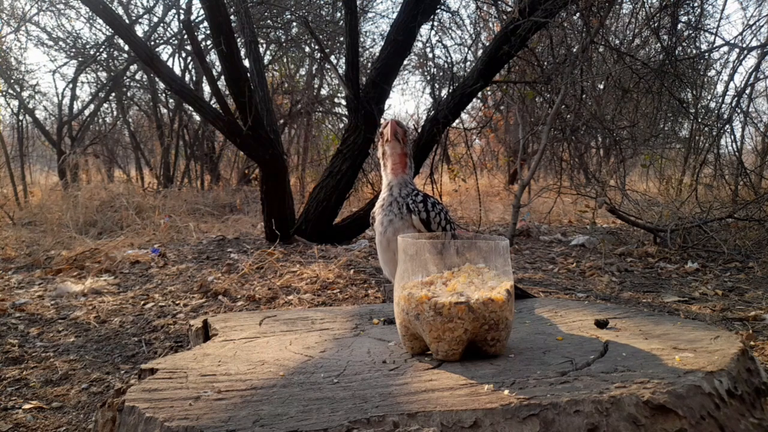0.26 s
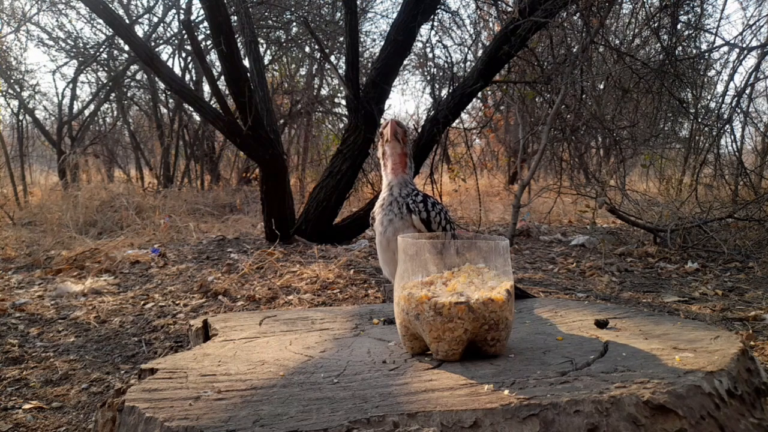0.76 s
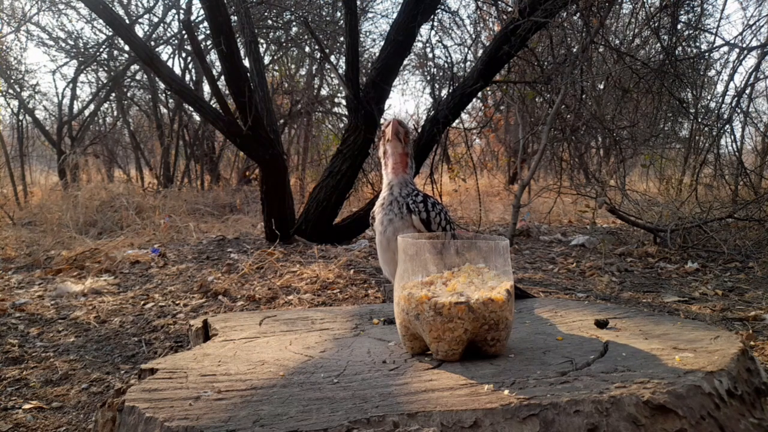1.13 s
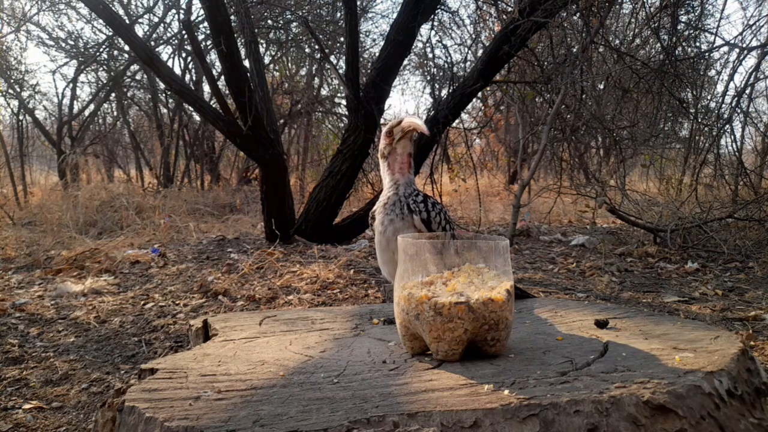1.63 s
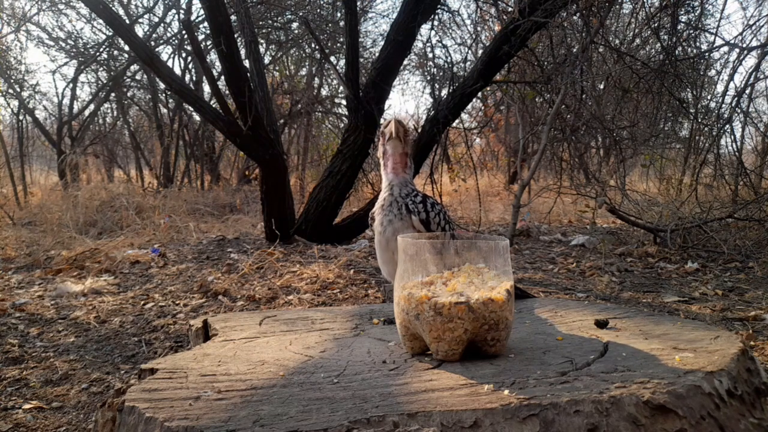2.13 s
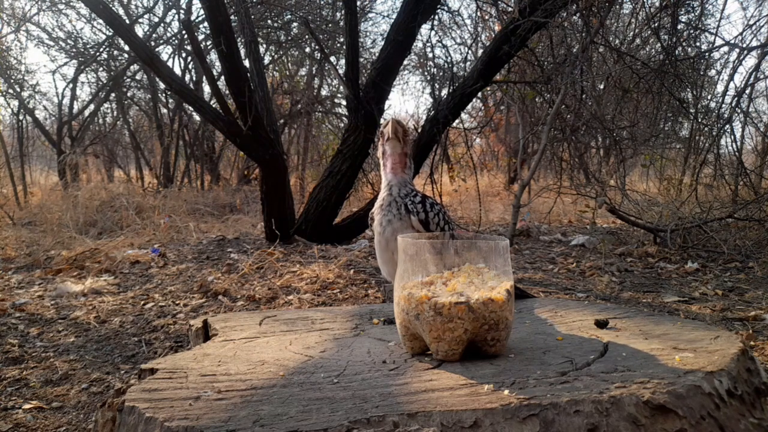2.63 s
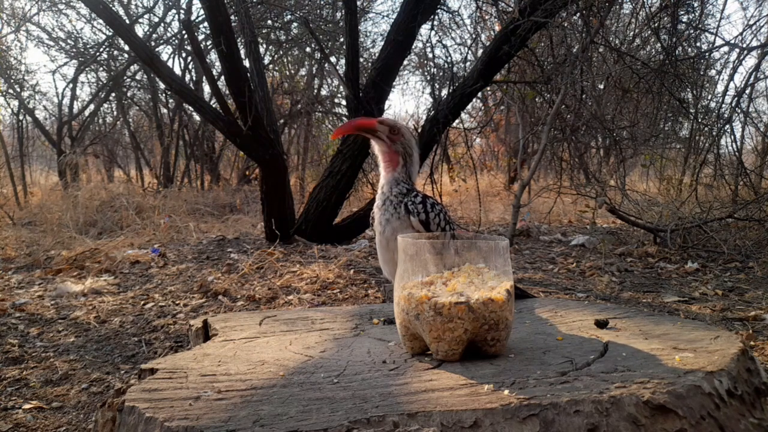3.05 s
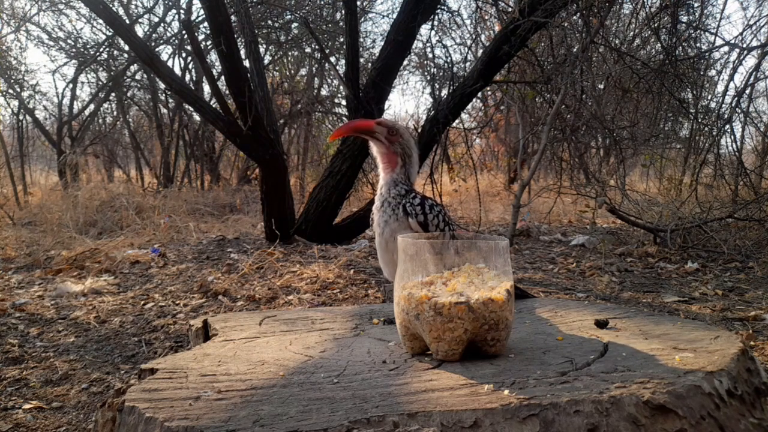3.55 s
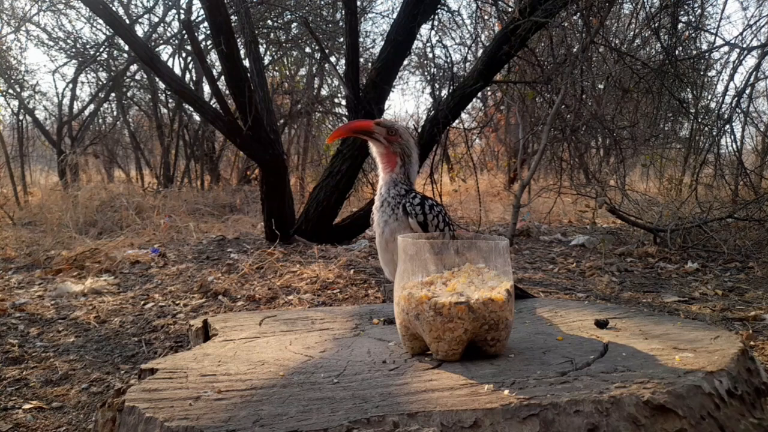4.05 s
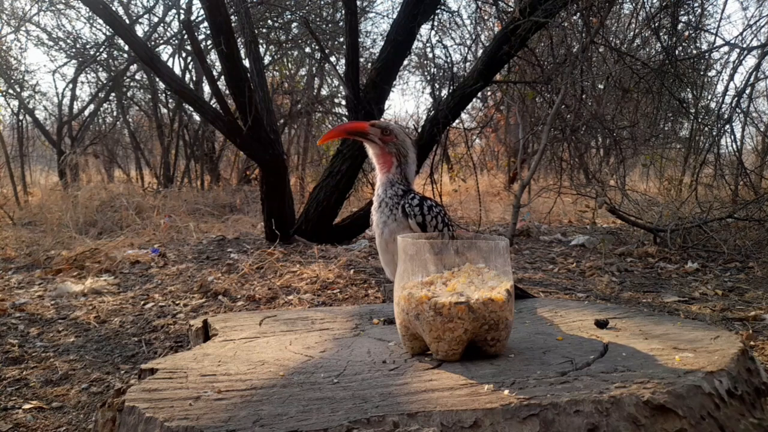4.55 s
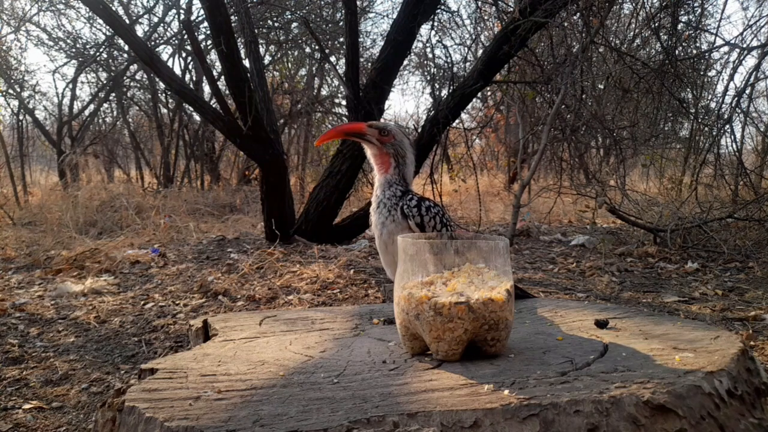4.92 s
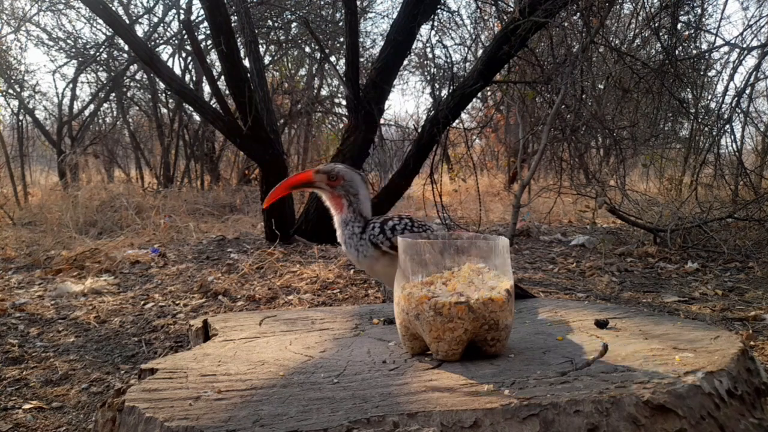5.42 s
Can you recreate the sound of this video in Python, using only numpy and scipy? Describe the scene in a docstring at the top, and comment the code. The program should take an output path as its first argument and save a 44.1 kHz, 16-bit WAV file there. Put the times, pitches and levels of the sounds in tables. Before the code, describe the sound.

A hornbill clucks close to a stereo microphone in dry bushland, about six notes a second in a long, even series. Each cluck swells on a steady pitch, flicks upward and breaks off in a short rasp, with a slight echo. After one tiny hesitation midway, the series carries on, then stops abruptly. Other birds call very faintly far off, over a low rumble and thin hiss.

```python
"""A long, even series of clucks from a red-billed hornbill on a stump, close to a stereo pair of
microphones in dry bushland. Each cluck swells on a steady note, flicks upward and breaks off in a
short rasp; ground and thicket throw it back. Then the bird stops. Other birds call faintly far off,
over a low rumble, and over air and hiss that the recorder turns down between clucks."""
import sys
import numpy as np
from scipy import signal
from scipy.fft import rfft, irfft
from scipy.io import wavfile
from scipy.ndimage import uniform_filter1d

SR = 44100
rng = np.random.default_rng(int(sys.argv[2]) if len(sys.argv) > 2 else 0)


def master(y):
    """Save y as 16-bit WAV."""
    cut = np.clip(np.atleast_2d(y).T, -1, 1)
    pcm = np.round(cut * 32767)  # scale
    wavfile.write(sys.argv[1], SR, pcm.astype(np.int16))


N = 250488
TIME = np.arange(N) / SR

# the hornbill's clucks: start_s, hold_s (until the flick), harsh_db (of the break)
CLUCK_EVENTS = [(.0715, .029, -3.5), (.2439, .038, -2.5), (.4258, .032, 3), (.6045, .032, -4),
                (.7819, .032, -7), (.9578, .032, 1), (1.1333, .034, -2), (1.309, .032, 5.5),
                (1.4826, .033, 5.5), (1.6561, .035, 4.5), (1.8296, .035, 8.5), (2.0035, .032, 4),
                (2.1759, .036, .5), (2.3538, .0305, -2.5), (2.5268, .032, 1), (2.6992, .032, -2.5),
                (2.8706, .036, -4.5), (3.1119, .022, -7), (3.2854, .03, -1), (3.4712, .0324, -3.5),
                (3.6519, .032, -5), (3.8341, .03, 5), (4.0113, .0306, 5.5), (4.1906, .035, 5.5),
                (4.3734, .029, 9.5), (4.5527, .03, 1.5), (4.7413, .029, -1.5), (4.9246, .028, 3),
                (5.1041, .031, -5)]
# the held note over the series, ahead of the throat: time_s, pitch_hz, level_db
HELD_NOTE = [(0, 604.5, -16.8), (1.1, 604.5, -16.7), (1.35, 596, -16.6), (1.9, 603.5, -16.4),
             (3.4, 608.5, -16.9), (4.35, 607, -16.5), (5.1, 603.5, -17.9)]
# filter of throat and bill: frequency_hz, gain_db
THROAT_RESPONSE = [(600, -2.5), (800, -1.2), (1380, -1.5), (1800, -29.5), (2000, -29), (2400, -37.5),
                   (3000, -37.5), (3600, -57), (4300, -41.5), (4850, -44), (5800, -55), (7800, -49.5),
                   (9800, -64.5), (12500, -51.5), (14000, -69.5)]
# change of colour with the bill turned aside: frequency_hz, gain_db
OFF_AXIS_RESPONSE = [(1200, 0), (2400, 1.5), (3200, -1.5), (4400, -5.5), (5500, 0), (7000, -3.5),
                     (12000, 1)]
# the bird's balance between the microphones: frequency_hz, left_over_right_db
MIC_BALANCE = [(600, -1.2), (780, -1.5), (1200, -3), (1450, 1.5), (1800, -2.5), (3000, -6), (4200, -4),
               (5400, -6), (6600, -3), (7700, 12.5), (9200, 2.5), (12500, 6.5)]
# its phase between the microphones: frequency_hz, left_lead_rad
MIC_PHASE = [(600, 0.43), (780, 0.085), (1200, 1.1), (1500, 1.5), (1800, 0.98), (3000, 0.77), (3600, 1.7),
             (5400, 2.2), (6800, 2.6), (12500, 3.2)]
# rasp as the note breaks: frequency_hz, relative_density_db
RASP_SPECTRUM = [(260, -20), (420, -18), (700, -9), (1000, 0), (1450, -6), (1900, -17), (2800, -29),
                 (3600, -37), (4500, -38), (7000, -42.5), (9500, -53.5), (12500, -42), (16000, -51.5)]
# single echoes off trunks: delay_s, gain_db
TRUNK_ECHOES = [(.043, -45), (0.074, -47)]
# hoarse birds far off: start_s, length_s, pitch_hz, width_hz, level_db
DISTANT_CALLS = [(3.57, 0.14, 1900, 300, -76), (3.673, 0.12, 3100, 500, -78),
                 (3.718, 0.096, 2400, 400, -76.5), (3.945, 0.24, 2150, 300, -76),
                 (4.124, .16, 2300, 300, -80.5), (4.269, 0.042, 2400, 200, -77)]
# colour of the low rumble: frequency_hz, relative_density_db
RUMBLE_SPECTRUM = [(30, -21), (40, -2), (48, 2.5), (57, -2), (70, -1), (100, -2.5), (150, -11.5),
                   (220, -18)]
# slow swells of the rumble: time_s, level_db
RUMBLE_SWELLS = [(0, -60), (2.4, -55.5), (3.6, -60), (4.1, -56.5), (5.68, -61)]
# colour of the open air: frequency_hz, relative_density_db
AIR_SPECTRUM = [(150, -4.5), (300, 2.5), (500, -3), (800, -4), (1300, -15), (2200, -19.5), (3500, -26),
                (5000, -49.5)]
# colour of the thin hiss: frequency_hz, relative_density_db
HISS_SPECTRUM = [(2000, -7.5), (3200, -3.5), (4500, 1), (6000, 3), (8000, -7), (9500, -6), (12500, 0),
                 (15800, -4.5)]
# slow swell of the hiss, ahead of the suppressor: time_s, level_db
HISS_SWELL = [(0, -71), (1.8, -70.8), (3.2, -68), (4.4, -70), (5.68, -70)]
# how alike noise is at the two microphones: frequency_hz, correlation
MIC_CORRELATION = [(40, 1), (150, .62), (400, 1), (1200, 0.33), (3000, -0.063), (6000, -.15),
                   (14000, 0.096)]


def hornbill(rasp_db=-40, rasp_delay_s=.006, rasp_rise_s=.0025, rasp_fall_s=.012, airflow_db=-34.5):
    """The bird close by: a little air noise rides on each note, and a puff of rasp follows its flick."""
    voice, puffs = np.zeros((2, N)), np.zeros(N)
    for start_s, hold_s, harsh_db in CLUCK_EVENTS:
        note, at = cluck(start_s, hold_s, harsh_db), int(start_s * SR)
        voice[:, at:at + note.shape[1]] += note
        span = slice(at, at + SR // 6)
        from_peak_s = TIME[span] - start_s - hold_s - rasp_delay_s
        puff = np.exp(np.minimum(from_peak_s / rasp_rise_s, -from_peak_s / rasp_fall_s))
        puffs[span] += from_db(.45 * harsh_db) * puff
    voice = signal.sosfiltfilt(highpass(3, hz=330), voice)  # a small throat radiates little bass
    airflow = uniform_filter1d(np.abs(voice).mean(0), size=150)
    return voice + (from_db(rasp_db) * puffs + from_db(airflow_db) * airflow) * noise(RASP_SPECTRUM)


def cluck(start_s, hold_s, harsh_db, attack_s=.0034, head_turn_s=2.98):
    """One note of the syrinx, through throat and bill to the microphones; it wobbles as it lets go."""
    t = np.arange(int((hold_s + .05) * SR)) / SR
    since_flick = (t - hold_s) * np.exp(.09 * rng.standard_normal())  # each lets go at its own pace
    wobble = (.0018 + .042 * np.clip(since_flick / .009, 0, 1.5)) * drift(400, len(t))
    held_hz, level_db = along(HELD_NOTE, start_s)
    sharp_start = .12 * np.exp(-t / .002)
    pitch_hz = held_hz * (1 + sharp_start + flick(since_flick, harsh_db)) * (1 + wobble)
    phase = 2 * np.pi * np.cumsum(pitch_hz) / SR
    harmonic = np.r_[1:25, 1.5, 2.5][:, None]
    hz = harmonic * pitch_hz
    source_db = level_db + syrinx_levels(harmonic, t, hold_s, since_flick, harsh_db)
    colour_db = at_hz(THROAT_RESPONSE, hz) + (start_s > head_turn_s) * at_hz(OFF_AXIS_RESPONSE, hz)
    # overtones speak a little after the fundamental
    attack = np.sin(np.pi / 2 * np.clip(t / (attack_s * np.sqrt(harmonic)), 0, 1)) ** 2
    ending = np.clip((t[-1] - t) / .0084, 0, 1)
    partials = attack * ending * from_db(source_db + colour_db) * (hz < SR / 2)
    pan_db, lead_rad = at_hz(MIC_BALANCE, hz), at_hz(MIC_PHASE, hz)
    at_mics = [partials * from_db(side * pan_db) * np.cos(harmonic * phase + side * lead_rad)
               for side in (.5, -.5)]
    return np.sum(at_mics, axis=1)


def flick(since_flick, harsh_db, lead_s=.004, rise_s=.0086, knee_s=.0014):
    """Pitch bend as a share of the held note: creeps up with pressure, leaps, sags as air runs out."""
    creep = .13 * np.minimum(since_flick, 0)
    pushed_s = knee_s * np.logaddexp(0, (since_flick + lead_s) / knee_s)
    risen = 1 - np.exp(-pushed_s / rise_s)
    leap = .26 * risen * (1 + .025 * harsh_db * risen ** 2)  # harsher notes flick higher
    sag = np.clip(28 * (since_flick - .021), 0, .36)
    return creep + leap - sag


def syrinx_levels(harmonic, t, hold_s, since_flick, harsh_db, start_pressure=.22, full_note_s=.028):
    """Partial levels in dB: pressure swells until the flick; overtones grow faster and go first."""
    progress = np.minimum(t / hold_s, 1)
    pressure = start_pressure + (1 - start_pressure) * progress * (1 + .55 * (1 - progress))
    swell_db = 20 * np.log10(pressure) - 800 * max(full_note_s - hold_s, 0)  # short notes stay weaker
    # the release fades ever faster, and the fundamental catches once
    fade_db = -20 * (np.maximum(since_flick, 0) / .0243) ** 2
    first_db = swell_db - 4.5 * np.exp(-((since_flick - .018) / .003) ** 2)
    low_db = .1 + 1.5 * swell_db - 13.5 * step(since_flick - .0035, width_s=.0011)
    upper_db = .4 + 2.25 * swell_db - 16 * step(since_flick - .002, width_s=.0018)
    # in a harsh break the pulses alternate strong and weak, sounding lines between the harmonics
    doubling_db = -24 + 1.3 * harsh_db - 10 * ((since_flick - .0105) / .0075) ** 2
    groups = [harmonic % 1 > 0, harmonic == 1, harmonic < 4]
    return fade_db + np.select(groups, [doubling_db, first_db, low_db], upper_db)


def bushland(direct, ground_db=-19.5, thicket_db=-32):
    """Quick echoes from the ground nearby, two off trunks and a faint long tail from the thicket."""
    # twigs, stones and trunks are too small to throw back the lows
    bright = signal.sosfilt(highpass(2, hz=1400), direct)
    ground = from_db(ground_db) * scatter(bright, delay_s=.006, t60_s=.07)
    trunks = sum(from_db(gain_db) * np.pad(bright, ((0, 0), (int(delay_s * SR), 0)))[:, :N]
                 for delay_s, gain_db in TRUNK_ECHOES)
    thicket = from_db(thicket_db) * scatter(bright, delay_s=.022, t60_s=.5)
    return direct + ground + trunks + thicket


def scatter(sound, delay_s, t60_s, dull_hz=9000):
    """Many small echoes off ground and branches, dying away."""
    t = np.arange(SR) / SR
    tail = rng.standard_normal((2, SR)) * from_db(-60 * t / t60_s) * (t > delay_s)
    tail /= np.sqrt((tail ** 2).sum(1, keepdims=True))
    tail = signal.sosfilt(signal.butter(1, dull_hz, fs=SR, output="sos"), tail)
    return signal.fftconvolve(sound, tail, axes=1)[:, :N]


def far_birds(chip_start_s=.488, chip_length_s=.022, chip_db=-64.5, echo_db=5):
    """Far off, one thin falling chip and a few hoarse calls, blurred by the trees."""
    progress = np.clip((TIME - chip_start_s) / chip_length_s, 0, 1)
    chip_hz = np.interp(progress, [0, 1], [6700, 4700])
    calls = from_db(chip_db) * np.sin(np.pi * progress) * np.sin(2 * np.pi * np.cumsum(chip_hz) / SR)
    for start_s, length_s, pitch_hz, width_hz, level_db in DISTANT_CALLS:
        at, size = int(start_s * SR), int(length_s * SR)
        hoarse = drift(2 * width_hz, size) * np.sin(2 * np.pi * pitch_hz * TIME[:size])
        calls[at:at + size] += from_db(level_db) * np.sqrt(np.hanning(size)) * unit_rms(hoarse)
    pair = np.array([calls, calls])
    return pair + from_db(echo_db) * scatter(pair, delay_s=.004, t60_s=.3)


def background(air_db=-63.5, pan_db=2):
    """The bed of the place: a fluttering low rumble a little to the right, open air and thin hiss."""
    rumble_db = along(RUMBLE_SWELLS, TIME)[0] + 1.5 * drift(16, N)
    rumble = from_db(rumble_db) * noise(RUMBLE_SPECTRUM) * from_db([[-pan_db], [pan_db]])
    air = from_db(air_db) * noise(AIR_SPECTRUM)
    hiss = from_db(along(HISS_SWELL, TIME)[0]) * noise(HISS_SPECTRUM)
    return rumble + air + hiss


def noise(spectrum):
    """Stereo noise of a given colour at unit rms, alike in the bass and unrelated in the treble."""
    hz = np.arange(N // 2 + 1) * SR / N
    alike = np.clip(at_hz(MIC_CORRELATION, hz), -.99, .99)
    mid, side = rfft(rng.standard_normal((2, N)))
    pair = np.sqrt(1 + alike) * mid + np.sqrt(1 - alike) * side * np.array([[1], [-1]])
    skirts = np.minimum(hz / spectrum[0][0], 1) ** 3 / np.maximum(hz / spectrum[-1][0], 1) ** 3
    return unit_rms(irfft(pair * from_db(at_hz(spectrum, hz)) * skirts, N))


def suppressor(sound, open_db=-29, shut_db=-50, release_db_per_s=330, pause_s=.35):
    """The recorder turns down all but the bass when it is quiet, the middle further in a long pause."""
    power = uniform_filter1d((sound ** 2).mean(0), size=256)
    level_db = 10 * np.log10(np.abs(power) + 1e-12)
    held_db = np.maximum.accumulate(level_db + release_db_per_s * TIME) - release_db_per_s * TIME
    shut = np.interp(held_db, [shut_db, open_db], [1, 0])
    quiet_s = TIME - np.maximum.accumulate(TIME * (level_db > open_db))
    paused = np.clip(2 * quiet_s / pause_s - 1, 0, 1)
    treble = signal.sosfiltfilt(highpass(2, hz=2200), sound)
    above_bass = signal.sosfiltfilt(highpass(2, hz=130), sound)
    bass, middle = sound - above_bass, above_bass - treble
    return bass + middle * from_db(-6 * shut - 2 * paused) + treble * from_db(-4 * shut)


def from_db(db):
    """Decibels to gain."""
    return 10 ** (np.asarray(db) / 20)


def along(rows, at):
    """A table's later columns, read at the given places of its first."""
    first, *columns = np.transpose(rows)
    return [np.interp(at, first, column) for column in columns]


def at_hz(points, hz):
    """A spectrum read on a log-frequency axis."""
    freq, value = np.transpose(points)
    return np.interp(np.log(np.maximum(hz, 1)), np.log(freq), value)


def unit_rms(x):
    """Scale to unit rms."""
    return x / np.sqrt(np.mean(x ** 2) + 1e-20)


def drift(rate_hz, size):
    """A random wander with a spread of about 1."""
    knots = rng.standard_normal(4096)
    return np.interp(np.arange(size) / SR * rate_hz, np.arange(len(knots)), knots)


def step(t, width_s):
    """A smooth rise from 0 to 1 around t = 0."""
    return .5 + .5 * np.tanh(t / (2 * width_s))


def highpass(order, hz):
    """Sections of a low-cut filter."""
    return signal.butter(order, hz, "high", fs=SR, output="sos")


def scene():
    """The hornbill close by in its bushland, other birds and the background beyond."""
    return bushland(hornbill()) + far_birds() + background()


def record(dry):
    """The recorder holds hiss down in the gaps and cuts the top steeply at 15.7 kHz."""
    top_cut = signal.ellip(10, .1, 80, 15700, fs=SR, output="sos")
    return signal.sosfilt(top_cut, suppressor(dry))


dry = scene()
out = record(dry)
master(out)
```